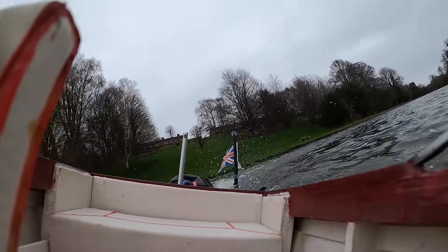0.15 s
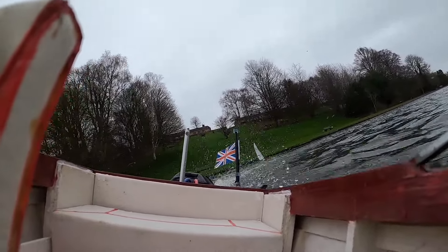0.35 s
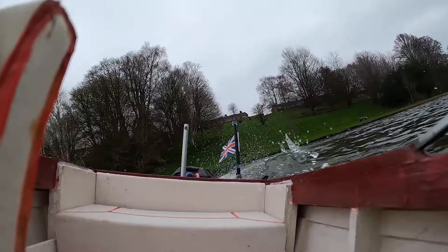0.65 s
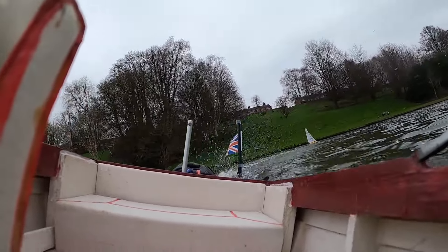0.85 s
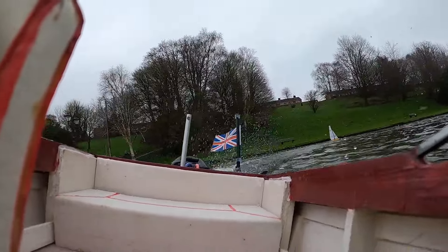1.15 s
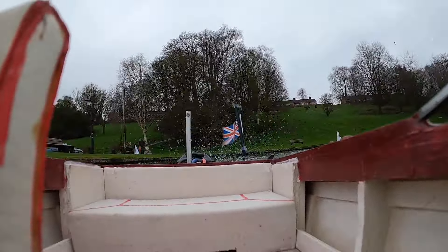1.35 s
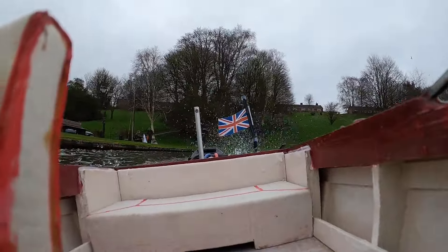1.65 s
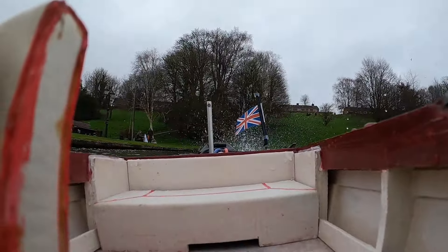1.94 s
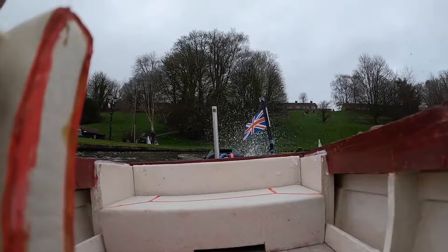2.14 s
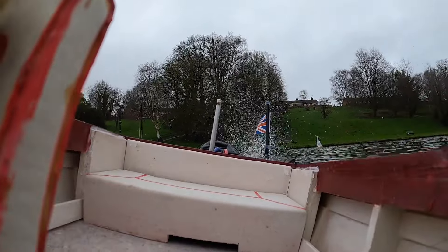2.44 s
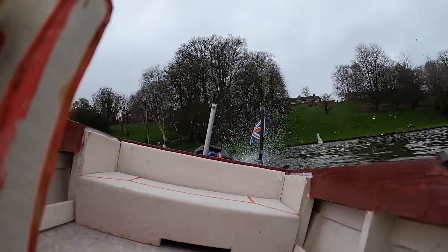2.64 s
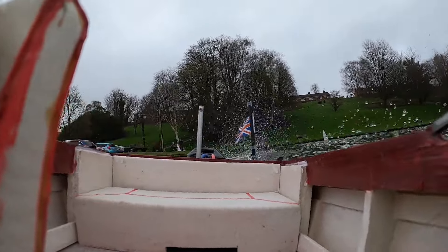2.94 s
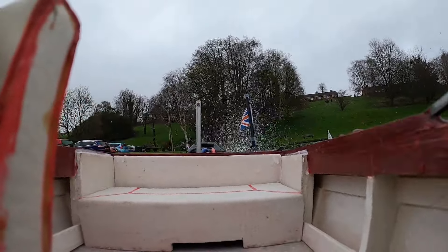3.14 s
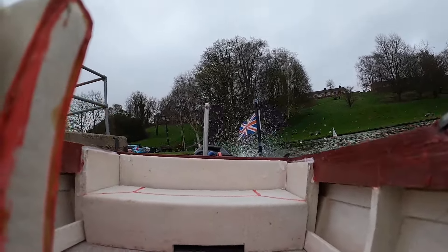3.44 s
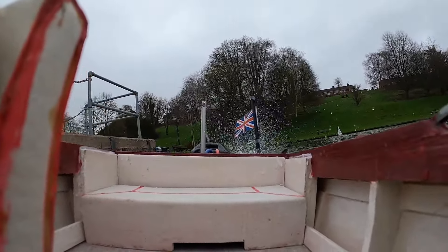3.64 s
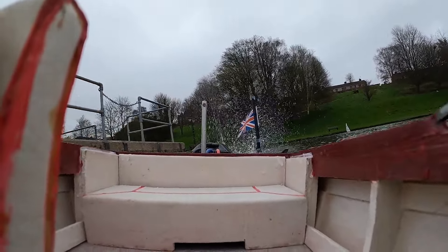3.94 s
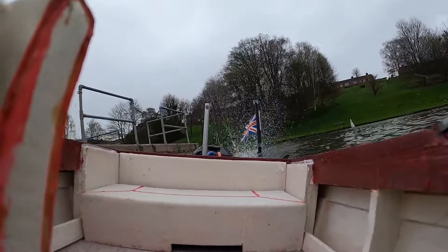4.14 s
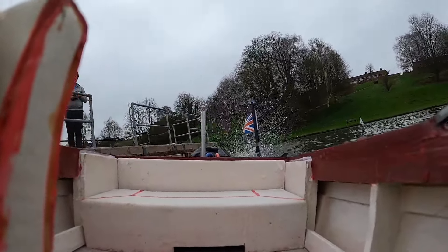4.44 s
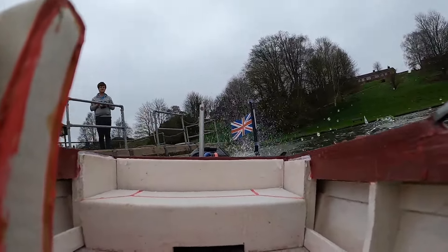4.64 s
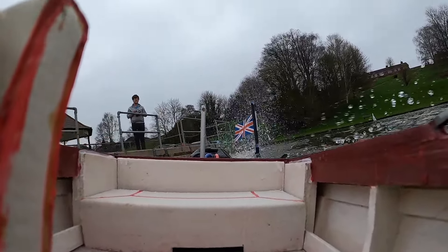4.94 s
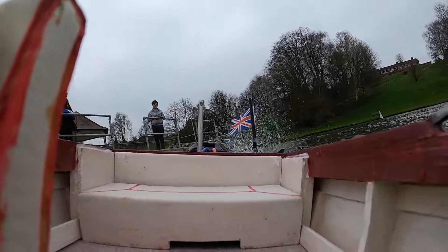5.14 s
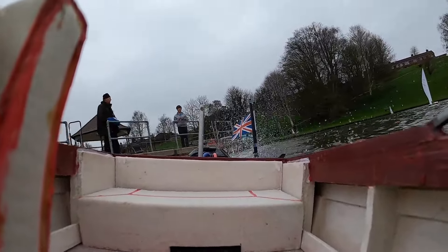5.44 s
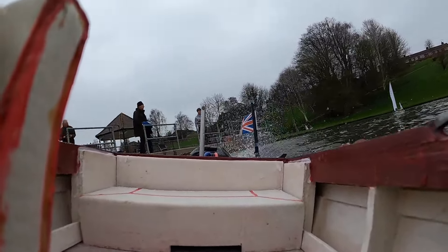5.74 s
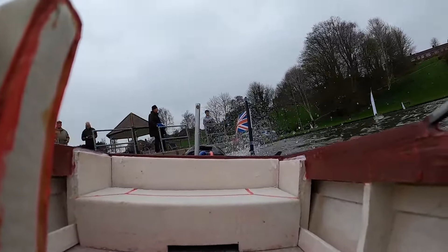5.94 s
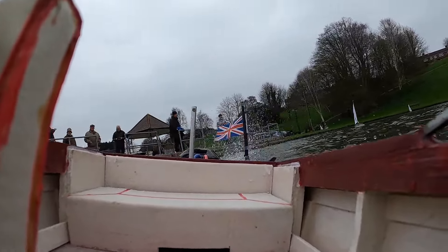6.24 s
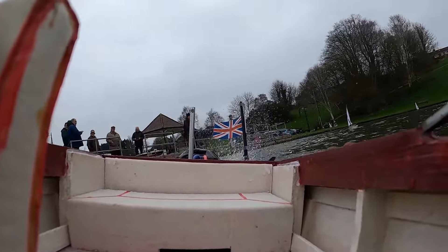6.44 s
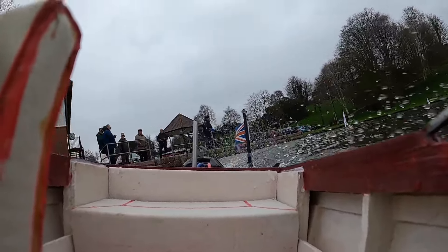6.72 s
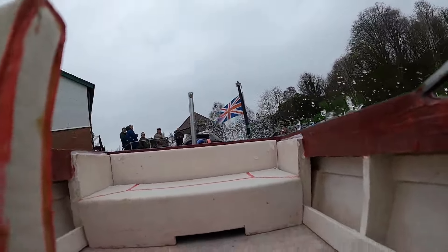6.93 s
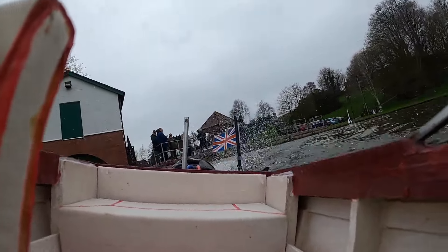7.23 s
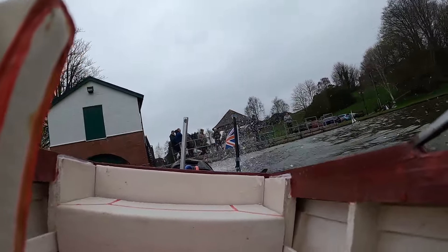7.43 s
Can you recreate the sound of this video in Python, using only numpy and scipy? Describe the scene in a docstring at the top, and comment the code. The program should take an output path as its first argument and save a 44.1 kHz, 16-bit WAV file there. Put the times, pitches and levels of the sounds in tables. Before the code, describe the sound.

A model speed boat's motor hums and booms steadily up close, while water rushes and slaps along the hull and spray hisses.

```python
"""A motor hums and booms close by: a model speed boat flat out on a lake, microphone in its open cockpit.
The hum sits on the orders of the shaft; as the boat bounces on the chop the propeller bites, booms in
the hull and drags the shaft down a little. The drive train whirrs, rattles and whines, water rushes and
slaps along the hull, bubbles plink, and spray hisses at the stern over a rumble of wind and chop.
The recorder's gain control ducks everything under the loudest booms and slaps."""
import sys
import numpy as np
from scipy import signal
from scipy.fft import rfft, irfft, next_fast_len
from scipy.io import wavfile
from scipy.ndimage import uniform_filter1d

SR = 44100
rng = np.random.default_rng(int(sys.argv[2]) if len(sys.argv) > 2 else 0)


def dump_mix(stems):
    """Bounce the given channels to the path in sys.argv[1] as a 16-bit WAV at rate SR."""
    frames = np.atleast_2d(stems).T  # one column per channel
    limited = np.clip(frames, -1, 1)  # hard clip at full scale
    pcm = np.round(limited * 32767).astype(np.int16)
    wavfile.write(sys.argv[1], SR, pcm)


N = 334278
BLADES = 2
# spectrum of flying water, spray and splashes alike: (frequency [Hz], relative level [dB])
SPRAY_SPECTRUM = [(1500, -14), (2300, -0.5), (3050, 0), (3600, -4), (4200, -6), (4600, -5.5), (4950, -9.5),
                  (6000, -14), (7700, -16.5), (8300, -21.5), (10300, -26), (11400, -36.5), (12600, -33),
                  (15600, -47.5)]


def from_db(db):
    """Decibels to gain."""
    return 10 ** (np.asarray(db) / 20)


def rms_one(x):
    """Scale to rms 1."""
    return x / np.sqrt(np.mean(np.abs(x) ** 2) + 1e-20)


def in_time(rows):
    """A curve's value at every sample."""
    return np.interp(np.arange(N) / SR, *np.transpose(rows))


def swing(rows):
    """A level curve in dB above and below its mean."""
    db = in_time(rows)
    return db - db.mean()


def swell(age, length, attack_s, release_s):
    """Attack, hold and release, 0 to 1."""
    return np.clip(np.minimum(age / attack_s, 1 + (length - age) / release_s), 0, 1)


def swells(rows, edge_s, fade_db_per_s=0):
    """The strength of a row of swells that rise, fade and let go alike."""
    t, strength = np.arange(N) / SR, np.zeros(N)
    for start, length, db in rows:
        shape = swell(t - start + edge_s / 2, length, edge_s, edge_s)
        strength = np.maximum(strength, shape * from_db(db - fade_db_per_s * np.clip(t - start, 0, 1)))
    return strength


def drift(rate):
    """A smooth random curve of spread 1 that changes about rate times a second."""
    step, settle = 40, 2000
    pole = np.exp(-2 * np.pi * rate * step / SR)
    noise = rng.standard_normal(N // step + settle + 2)
    slow = signal.lfilter([1], [1, -2 * pole, pole * pole], noise)[settle:]
    return np.interp(np.arange(N) / step, np.arange(len(slow)), rms_one(slow))


def coloured(x, spectrum):
    """Shape a sound by (Hz, dB) points, falling 24 dB an octave past both ends; rms 1."""
    size = next_fast_len(N)
    points_hz, points_db = np.transpose(spectrum)
    knots = np.log2(points_hz)
    octave = np.log2(np.maximum(np.arange(size // 2 + 1) * SR / size, 1))
    octaves_outside = np.abs(octave - np.clip(octave, knots[0], knots[-1]))
    gain_db = np.interp(octave, knots, points_db) - 24 * octaves_outside
    return rms_one(irfft(rfft(x, size) * from_db(gain_db), size)[:N])


def resonate(x, hz, width_hz):
    """One resonance, gain 1 on top."""
    r = np.exp(-np.pi * width_hz / SR)
    feedback = [1, -2 * r * np.cos(2 * np.pi * hz / SR), r * r]
    return signal.lfilter(np.array([1, 0, -1]) * (1 - r * r) / 2, feedback, x)


def grains(per_s, spread_db):
    """Tiny impacts at random moments, uneven in strength as the spread grows; rms 1."""
    sizes = from_db(spread_db * np.minimum(rng.exponential(1, N), 5))
    return rms_one(sizes * rng.choice([-1, 1], N) * (rng.random(N) < per_s / SR))


def partial(angle, unsteady, flutter_rate):
    """A tone of rms 1 whose unsteady share (0-1) flutters in strength and phase."""
    flutter = drift(flutter_rate) * np.cos(angle) + drift(flutter_rate) * np.sin(angle)
    steady = np.cos(angle + rng.uniform(0, 2 * np.pi))
    return np.sqrt(2 * (1 - unsteady ** 2)) * steady + unsteady * flutter


def buffet():
    """Wind and chop rumble around the cockpit; each lurch of the boat thumps and dies away."""
    # steady rumble: (time [s], relative level [dB])
    rumble = [(0.0, -38.5), (1.41, -38.5), (1.92, -41.5), (2.79, -39.5), (3.08, -40.5), (6.04, -41.5),
              (7.58, -36.5)]
    # lurches of the boat: (start [s], length [s], relative level [dB])
    lurches = [(0.247, 0.033, -33), (0.555, 0.04, -33), (0.91, 0.036, -34), (2.696, 0.051, -32),
               (2.748, 0.044, -30), (3.325, 0.044, -31.5), (5.846, 0.032, -31), (6.693, 0.045, -28.5),
               (6.838, 0.03, -32), (6.93, 0.085, -22), (7.141, 0.031, -28), (7.185, 0.034, -28),
               (7.429, 0.056, -30)]
    # spectrum of the rumble: (frequency [Hz], relative level [dB])
    spectrum = [(12, -14.5), (28, -4), (52, -1.5), (80, -3.5), (130, -4.5), (220, -13), (400, -35)]
    steady = from_db(-38.5 + swing(rumble))
    thumps = from_db(6) * swells(lurches, edge_s=0.011, fade_db_per_s=150)
    lumpy_noise = rng.standard_normal(N) * from_db(2.4 * drift(30))
    return np.hypot(steady, thumps) * coloured(lumpy_noise, spectrum)


def droplets(per_s, cycles, pitches=18):
    """Single drops tick on the deck, each ringing a few cycles at one of a set of pitches; rms 1."""
    hits = grains(per_s, spread_db=0)
    pitch_index = rng.integers(0, pitches, N)
    ticks = np.zeros(N)
    for k, hz in enumerate(np.geomspace(2400, 8200, pitches)):
        ticks += resonate(hits * (pitch_index == k) + 1e-18, hz, hz / cycles) * np.sqrt(3000 / hz)
    return rms_one(ticks)


def spray(churn):
    """Astern of the microphone, fine drops patter in clumps over a faint, even hiss of mist."""
    # spray at the stern: (time [s], relative level [dB])
    levels = [(0.0, -42), (1.24, -41.5), (2.17, -40), (4.6, -39.5), (4.66, -41.5), (7.58, -40.5)]
    patter = grains(per_s=7700, spread_db=1) + 0.8 * rng.standard_normal(N)
    dulled = rms_one(signal.sosfilt(signal.butter(1, 10500, fs=SR, output="sos"), patter))
    drops = dulled + 0.55 * droplets(per_s=260, cycles=14)
    clumps = coloured(drops * from_db(2.2 * churn + 0.5 * drift(47)), SPRAY_SPECTRUM)
    mist = coloured(np.diff(rng.standard_normal(N + 1)), SPRAY_SPECTRUM)
    return from_db(-39.5 + swing(levels)) * clumps + from_db(-49) * mist


def wash():
    """Lumps of water drum along the hollow hull below the microphone, harder when a wave passes."""
    # water along the hull: (time [s], relative level [dB])
    levels = [(0.0, -24), (1.79, -27.5), (4.28, -25), (4.6, -22.5), (6.27, -26), (6.8, -24), (7.18, -32),
              (7.58, -19)]
    # waves surging past: (start [s], length [s], relative level [dB])
    surges = [(0.02, 0.039, -25), (0.1, 0.053, -19), (4.777, 0.072, -24), (5.4, 0.039, -14),
              (5.601, 0.037, -16), (5.863, 0.052, -16), (6.704, 0.072, -11)]
    # spectrum of the drumming hull: (frequency [Hz], relative level [dB])
    spectrum = [(90, -31), (180, -10.5), (220, -4), (252, 5), (285, 2.5), (318, -9), (365, 0), (410, 3.5),
                (470, -2.5), (540, -2.5), (600, -5), (670, -22), (1000, -19), (2000, -47)]
    lumps = grains(per_s=1500, spread_db=1) * from_db(1.4 * drift(31))
    flow = from_db(-23.5 + 0.83 * swing(levels))
    waves = from_db(-6) * swells(surges, edge_s=0.026)
    return np.hypot(flow, waves) * coloured(lumps, spectrum)


def plinks(t60_at_1khz=0.03, rise_s=0.0012, glide_per_s=2.5, gain_db=-4.5):
    """A trapped bubble rings briefly, rising in pitch; small ones die sooner."""
    # ringing air pockets and drops: (time [s], starting pitch [Hz], relative level [dB])
    bubbles = [(0.101, 750, -5), (0.249, 430, -4), (0.248, 2630, -13), (0.386, 550, 1), (1.111, 764, -12),
               (1.115, 2440, -9), (2.081, 3660, -14), (2.37, 3460, -17), (2.495, 894, -11),
               (3.217, 1900, -7), (4.812, 450, 6), (5.014, 707, -17), (5.263, 1543, 2.5), (5.459, 1510, -3),
               (5.571, 1440, 0.5), (5.604, 471.4, 0), (5.766, 1988, -3.5), (5.848, 1390, -4),
               (6.44, 711, -8), (6.64, 2729, -12), (6.698, 1730, 0.5), (6.701, 714, -20),
               (7.239, 2550, -15)]
    out = np.zeros(N)
    for time_s, hz, level_db in bubbles:
        start = int(time_s * SR)
        age = np.arange(N - start)[:SR // 20] / SR
        t60 = t60_at_1khz * (1000 / hz) ** (1 / 3)
        strength = (1 - np.exp(-age / rise_s)) * from_db(level_db + gain_db - 60 * age / t60)
        phase = 2 * np.pi * hz * age * (1 + glide_per_s * age / 2)
        out[start:start + len(age)] += strength * np.sin(phase)
    return out


def slaps(rise_s=0.0016, slosh_t60=0.063, splash_rise_s=0.0027, splash_t60=0.068):
    """Each wavelet knocks the hull into its modes, sloshes along it and throws a short splash."""
    # wavelets meeting the hull: (time [s], relative thud level [dB], relative splash level [dB])
    wavelets = [(0.1, -20, -50), (0.248, -7, -28), (0.383, -9, -42), (0.571, -4.5, -35), (1.111, -9, -37),
                (1.891, -15, -51), (2.081, -37, -37), (2.376, -20, -31), (2.825, -13, -30.5),
                (2.87, -12.5, -34), (3.27, -16, -45), (3.645, -15, -30), (3.799, -21, -42),
                (4.22, -11, -37), (4.379, -16, -28), (4.812, -6, -35), (4.911, -14, -39),
                (5.014, -14.5, -37), (5.379, -22, -32), (5.461, -8.5, -32), (5.570, -8, -30),
                (5.846, -17.5, -30), (6.173, -13.5, -30), (6.431, -12.5, -38), (6.64, -36, -29.5),
                (6.699, -4, -30), (6.755, -14, -49), (6.829, -9.5, -48), (6.885, -7.5, -40),
                (6.937, -3, -42), (7.489, -9.5, -28)]
    # modes of the hull: (frequency [Hz], relative level [dB], t60 [s])
    hull_modes = [(58.5, -14, 0.073), (269, 0, 0.095), (411, -1.5, 0.071), (538, -2, 0.033),
                  (750, -11.5, 0.018), (1430, -5, 0.019), (1900, -3, .014)]
    # spectrum of the slosh: (frequency [Hz], relative level [dB])
    slosh_spectrum = [(60, -18.5), (200, -10.5), (260, -1), (320, 3.5), (400, -2), (550, 0.5), (750, -7),
                      (1300, -16.5), (1700, -14.5), (2080, -20.5), (2350, -19), (4000, -43)]
    knock, slosh, splash = np.zeros((3, N))
    for time_s, thud_db, splash_db in wavelets:
        start = int(time_s * SR)
        age = np.arange(N - start)[:SR // 3] / SR
        span = slice(start, start + len(age))
        rise = 1 - np.exp(-age / rise_s)
        # every wavelet meets the hull at another spot, so each mode gets a strength of its own
        strengths = from_db(thud_db + rng.normal(0, 1.5, len(hull_modes)))
        strengths *= rng.choice([-1, 1], len(hull_modes))
        for strength, (hz, mode_db, t60) in zip(strengths, hull_modes):
            decay = from_db(mode_db - 60 * age / t60)
            knock[span] += rise * strength * decay * np.sin(2 * np.pi * hz * age)
        slosh[span] += rise * from_db(thud_db - 1.5 - 60 * age / slosh_t60)
        splash_rise = 1 - np.exp(-age / splash_rise_s)
        splash[span] += splash_rise * from_db(splash_db + 3.5 - 60 * age / splash_t60)
    slosh_noise = coloured(rng.standard_normal(N), slosh_spectrum)
    splash_noise = coloured(rng.standard_normal(N), SPRAY_SPECTRUM)
    return knock + slosh * slosh_noise + splash * splash_noise


def whirr(angle, load_db, churn):
    """Gears and shaft rattle, bunched twice a turn; they shake the hull's panels and ring the motor."""
    # response of the panels: (frequency [Hz], relative level [dB])
    panel_spectrum = [(550, -16), (700, -3), (790, -8.5), (860, -1.5), (1000, -2.5), (1150, 0), (1320, -5),
                      (1450, -1), (1680, 2), (1820, 0), (1950, 0.5), (2100, -2), (2250, -17.5), (2700, -33)]
    # narrow rings of the motor and its mount: (frequency [Hz], nominal width [Hz], level [dB])
    motor_rings = [(1646, 100, -39), (4372, 80, -49.5)]
    rattle = grains(per_s=5000, spread_db=0.5) * (1 + 0.11 * np.cos(2 * angle))
    rattle *= from_db(1.03 * churn + drift(42))
    panels = from_db(-25.5) * coloured(rattle, panel_spectrum)
    rings = np.zeros(N)
    for hz, width_hz, level_db in motor_rings:
        ring = resonate(rattle, hz, 1.8 * width_hz)
        rings += from_db(level_db) * rms_one(resonate(ring, hz, 1.8 * width_hz))
    return from_db(load_db) * (panels + rings)


def whine(angle, load_db, twist_hz=3.5, throb_db=2.2):
    """A thin tone, twelve beats a turn, that wavers as the shaft twists back and forth under load."""
    twist = 2 * np.pi * np.cumsum(twist_hz * drift(16)) / SR
    strength = from_db(-33 + 1.3 * load_db + throb_db * drift(14))
    return strength * partial(12 * angle + twist, unsteady=0.31, flutter_rate=24)


def motor(angle, load_db):
    """Shaft orders, close up: the middle ones buzz, the high ones flutter fast and follow the load."""
    # tones of the shaft: (order [per turn], level [dB], unsteady share [0-1])
    orders = [(1, -45, 0.7), (3, -31, 0.28), (4, -35, 0.34), (5, -47, 0.5), (6, -44, 0.7), (7, -45.5, 0.9),
              (8, -42.5, 0.6), (10, -42, 0), (11, -46, 1), (13, -44, 1), (14, -40, 0.7), (15, -46.5, 1)]
    # buzz of the middle orders: (time [s], gain [dB])
    buzz = [(0, 10), (.6, 5.5), (1.2, 6), (1.6, 7), (2.3, 4.5), (2.7, -3.5), (3.3, 2.5), (5.4, -2),
            (6.6, 1), (7.58, -2)]
    out, buzz_db = np.zeros(N), in_time(buzz)
    for order, level_db, unsteady in orders:
        follows_db = buzz_db if order < 7 else load_db
        share = {1: 0, 3: 0.45}.get(order, 1)  # the lowest orders follow less, or not at all
        tone = partial(order * angle, unsteady, flutter_rate=2.6 * order)
        out += from_db(level_db + share * follows_db) * tone
    return out


def bites(attack_s=0.0506, release_s=0.04017, lead_s=0.025, growth_db_per_s=6, sag_hz_per_s=18.7):
    """Each bite sets in, grows and lets go as the shaft sags: (strength, change of blade beat [Hz])."""
    # the propeller digs into the chop: (start [s], length [s], relative level [dB])
    digs = [(0.224, 0.048, -14), (0.5, 0.054, -15.5), (0.556, 0.096, -12.5), (0.675, 0.074, -24),
            (1.064, 0.072, -16.5), (1.161, 0.152, -12.5), (2.418, 0.057, -14), (2.517, 0.042, -15),
            (2.606, 0.085, -14.5), (2.726, 0.093, -12.5), (3.095, 0.041, -15.5), (3.163, 0.053, -15),
            (3.454, 0.064, -12), (3.528, 0.048, -17.5), (3.602, 0.048, -14), (3.66, 0.029, -13),
            (3.85, 0.033, -13), (4.023, 0.044, -15), (4.214, 0.19, -13), (4.681, 0.16, -12),
            (5.101, 0.084, -14.5), (5.237, 0.039, -7.5), (5.432, 0.069, -19.5), (5.535, 0.048, -13),
            (5.732, 0.026, -13), (5.897, 0.11, -13), (6.159, 0.058, -16.5), (6.312, 0.081, -17),
            (6.46, 0.053, -14), (6.506, 0.029, -15.5), (6.755, 0.1, -13.5), (6.867, 0.036, -15),
            (6.927, 0.068, -14), (7.415, 0.09, -12), (7.509, 0.07, -14.5)]
    t = np.arange(N) / SR
    strength, sag_hz = np.zeros((2, N))
    for start, length, level_db in digs:
        shape = swell(t - start + lead_s, length + lead_s / 2, attack_s, release_s)
        past_middle_s = np.clip(t - start - length / 2, -length, length)
        strength = np.maximum(strength, shape * from_db(level_db + 1 + growth_db_per_s * past_middle_s))
        sag_hz -= sag_hz_per_s * shape * past_middle_s
    return strength, sag_hz


def propeller(angle, bite, free_running_db=-22, throb_db=2.4):
    """Two blades beat against the hull: a throbbing hum that booms when they bite deeper."""
    # hum between bites: (time [s], relative level [dB])
    levels = [(0, -0.5), (.6, 5.5), (.8, -2), (.9, 3), (1.2, 3.5), (1.42, -8.5), (1.62, 1), (1.76, -11),
              (1.9, -12), (2.04, 8.5), (2.18, -13.5), (2.4, 3), (2.9, -0.5), (4.6, 2.5), (5.35, -2.5),
              (6.3, 3), (6.65, -1.5), (7.58, 3.5)]
    hum = from_db(free_running_db + in_time(levels) + throb_db * drift(19))
    return np.hypot(bite, hum) * partial(BLADES * angle, unsteady=0.2, flutter_rate=30)


def scene():
    """Mono, in the cockpit: one shaft drives the machine's tones; churn shakes rattle and spray alike."""
    # shaft speed, as the beat of the blades: (time [s], frequency [Hz])
    blade_beat = [(0.0, 271.1), (0.17, 280.9), (1.86, 275.4), (1.96, 282.8), (2.13, 271.7), (2.2, 290),
                  (2.3, 275.8), (3.95, 277.7), (4.65, 275.4), (4.79, 282), (5.0, 273.7), (5.19, 280),
                  (6.67, 276.2), (6.73, 268.3), (6.95, 286.9), (7.11, 276.6), (7.5, 280.5), (7.58, 276.1)]
    # load on the drive train: (time [s], relative level [dB])
    load = [(0.0, -36), (0.02, -30.5), (1.56, -31), (1.58, -27.5), (2.7, -26.5), (2.72, -29.5),
            (4.68, -30.5), (4.75, -32), (5.85, -30), (5.87, -35), (6.71, -27), (6.73, -37.5), (7.26, -31.5),
            (7.33, -26), (7.45, -32), (7.58, -27)]
    bite, sag_hz = bites()
    wander = 1 + 0.003993 * drift(7.98)
    shaft_hz = (in_time(blade_beat) + sag_hz) / BLADES * wander
    angle = 2 * np.pi * np.cumsum(shaft_hz) / SR
    churn = 0.88 * drift(18) + 0.5 * drift(2.5)
    load_db = swing(load)
    mild_load_db = 0.34 * load_db
    tones = propeller(angle, bite) + motor(angle, mild_load_db) + whine(angle, load_db)
    machine = tones + whirr(angle, mild_load_db, churn)
    water = wash() + slaps() + plinks() + spray(churn)
    return (machine + water + buffet())[None]


def gain_control(x, threshold_db=-11.5, squeeze=0.7, recovery_db_per_s=65, sense_s=0.0038):
    """The recorder's gain drops at once when the sound passes the threshold, then creeps back."""
    size = int(sense_s * SR)
    level_db = 10 * np.log10(np.abs(uniform_filter1d(x[0] ** 2, size)) + 1e-12)
    excess_db = np.maximum(level_db - threshold_db, 0)
    recovery_db = recovery_db_per_s * np.arange(N) / SR
    cut_db = np.maximum.accumulate(squeeze * excess_db + recovery_db) - recovery_db
    return x * from_db(-uniform_filter1d(cut_db, size))


def record(dry, ceiling=0.8, cutoff_hz=15700):
    """The recorder on board ducks the loud moments, rounds the highest peaks and cuts the top."""
    held = gain_control(dry * from_db(0.26))
    rounded = held / (1 + (np.abs(held) / ceiling) ** 6) ** (1 / 6)
    return signal.sosfilt(signal.ellip(10, 0.1, 80, cutoff_hz, fs=SR, output="sos"), rounded)


dry = scene()
out = record(dry)
dump_mix(out)
```